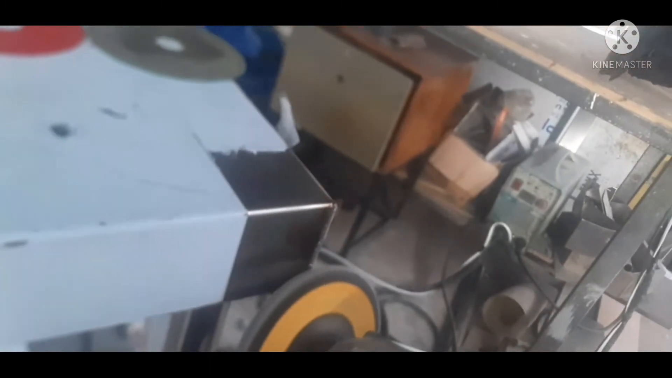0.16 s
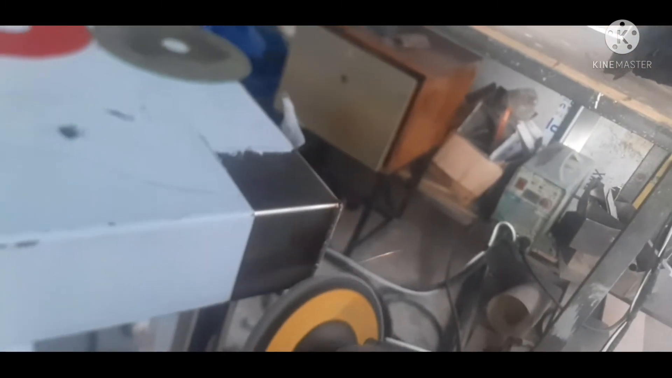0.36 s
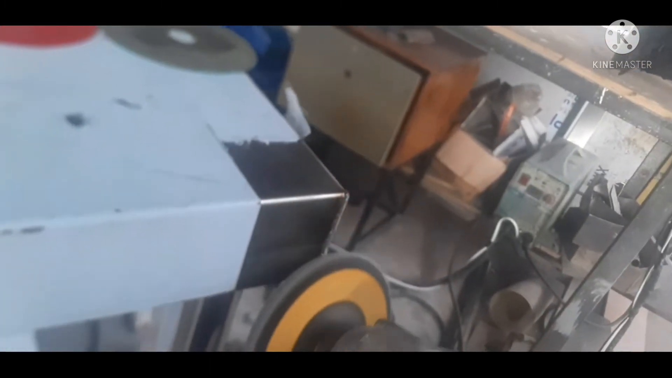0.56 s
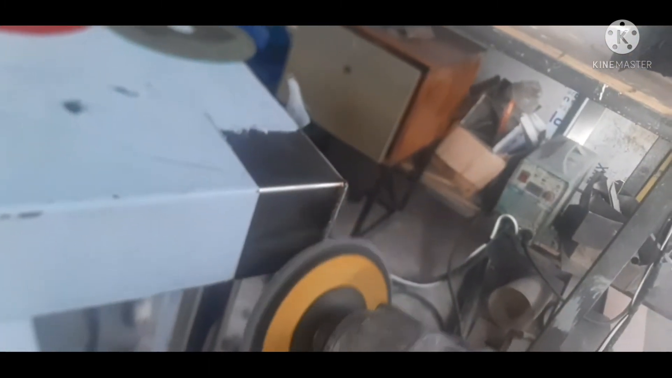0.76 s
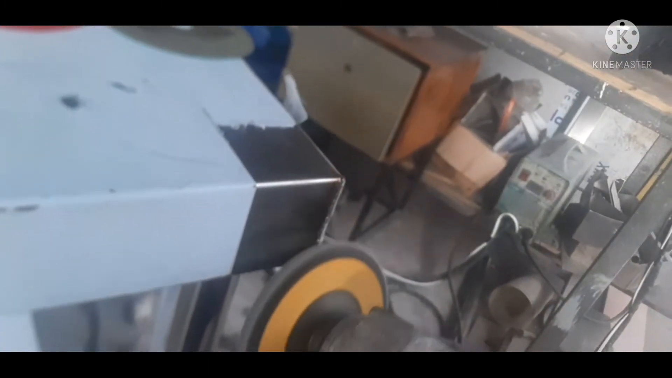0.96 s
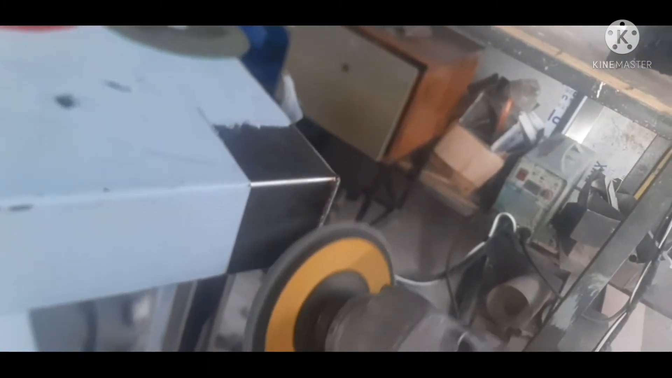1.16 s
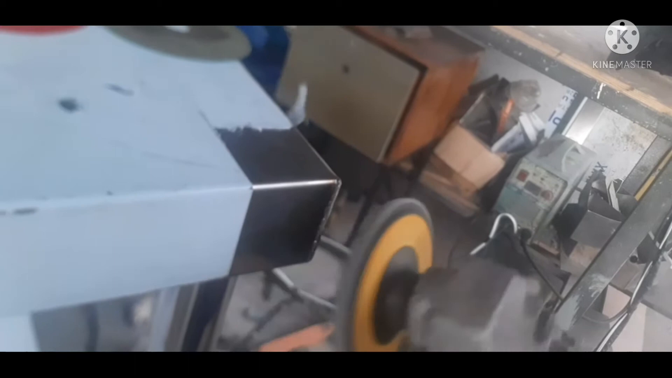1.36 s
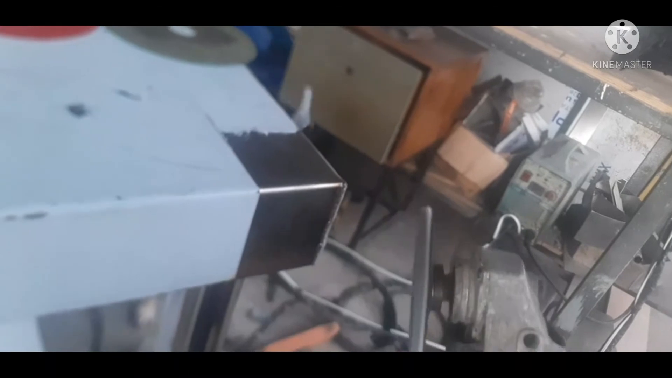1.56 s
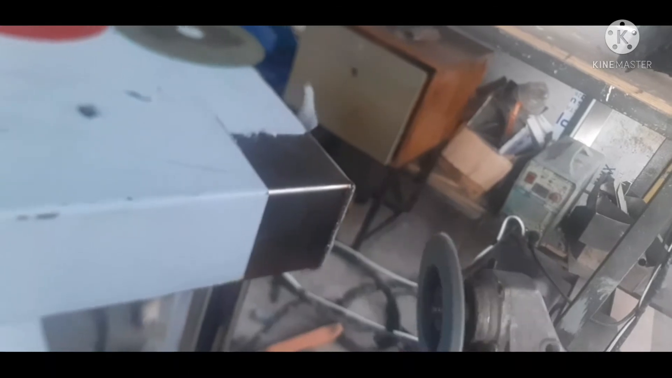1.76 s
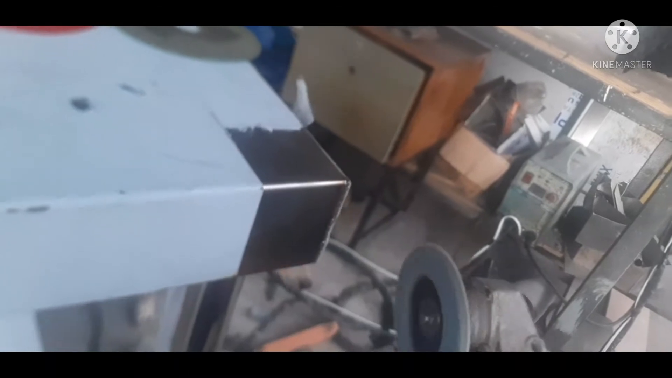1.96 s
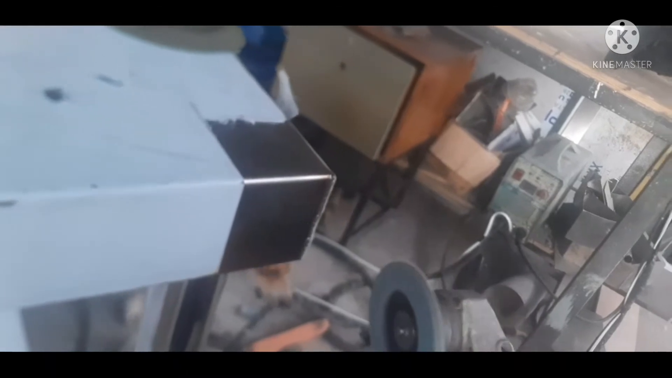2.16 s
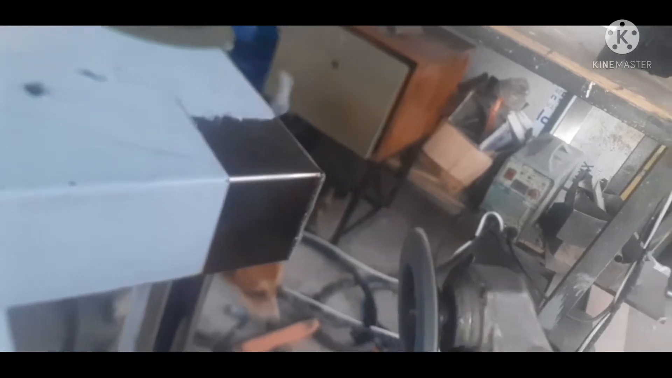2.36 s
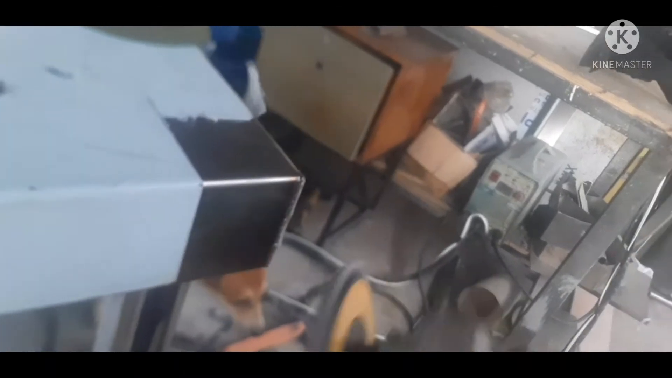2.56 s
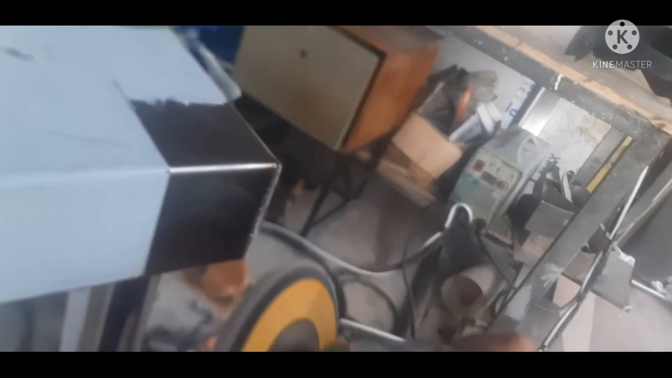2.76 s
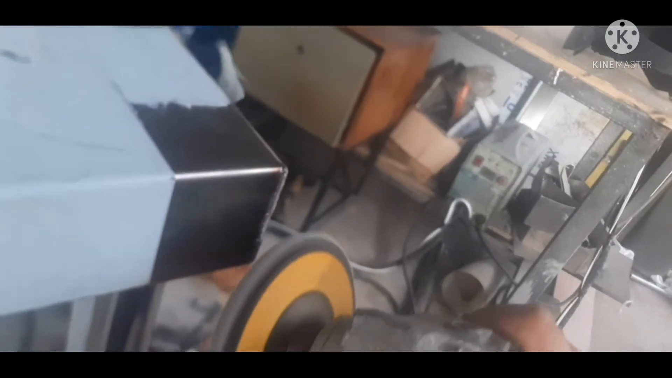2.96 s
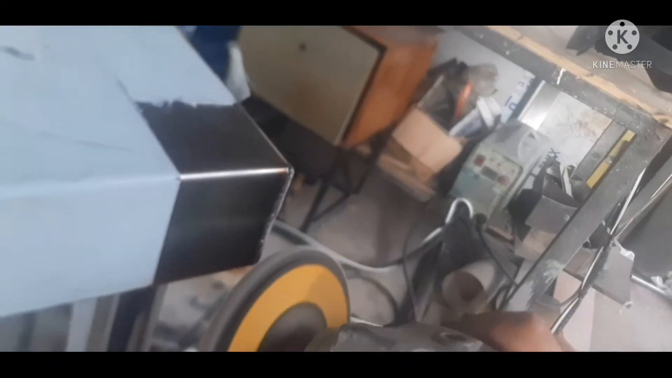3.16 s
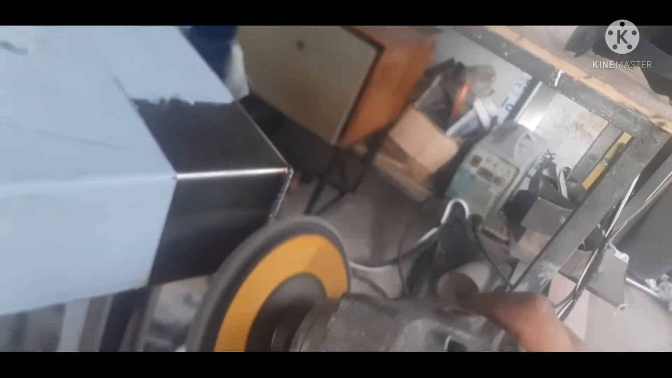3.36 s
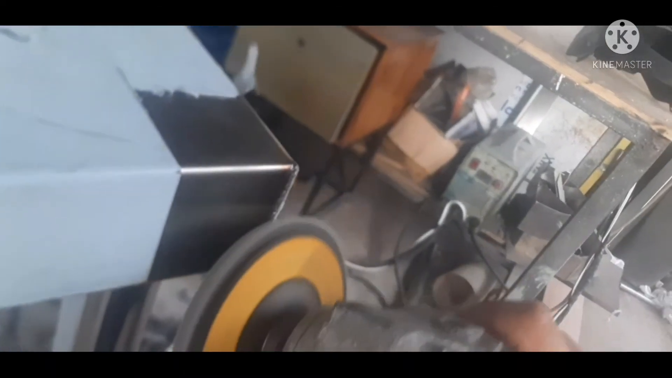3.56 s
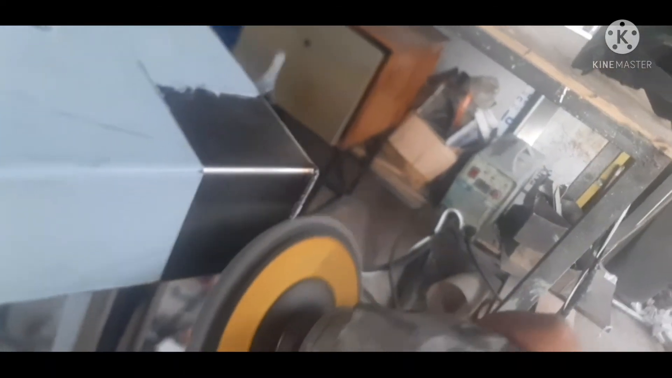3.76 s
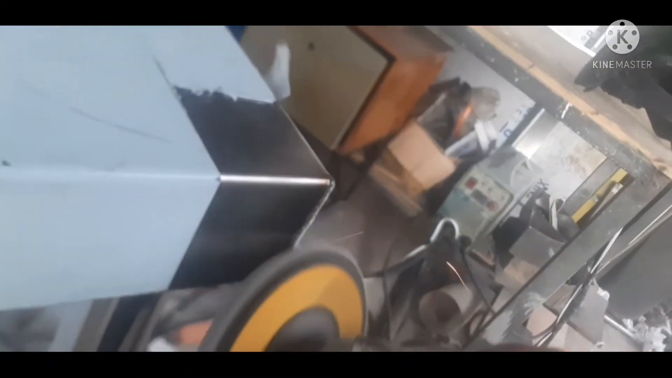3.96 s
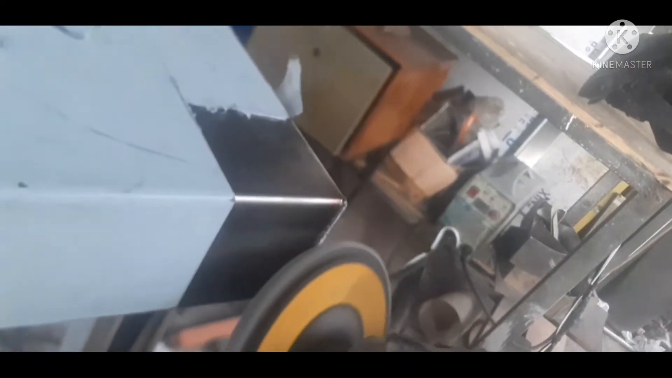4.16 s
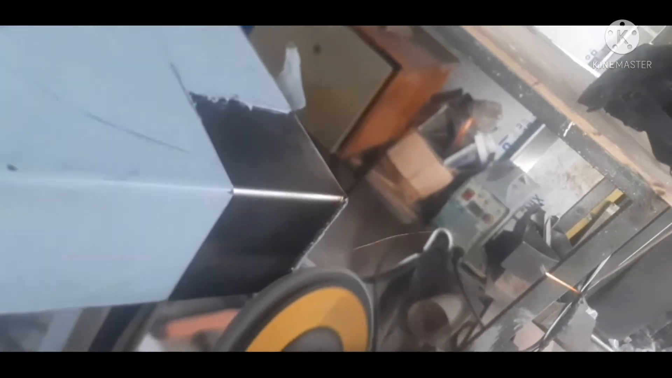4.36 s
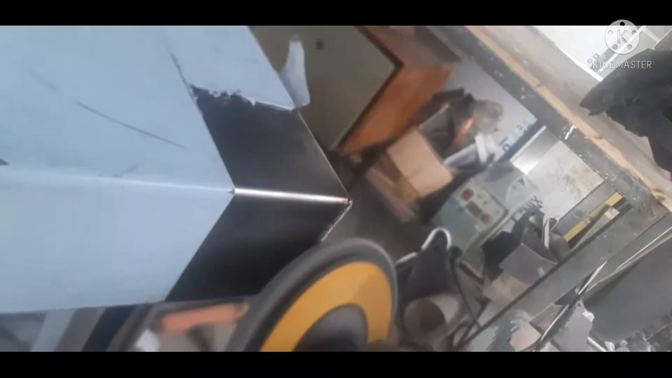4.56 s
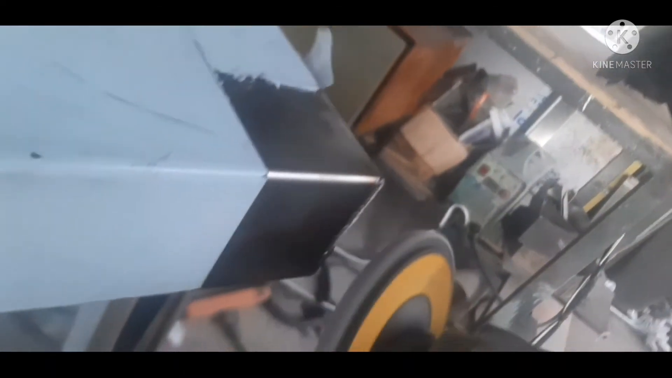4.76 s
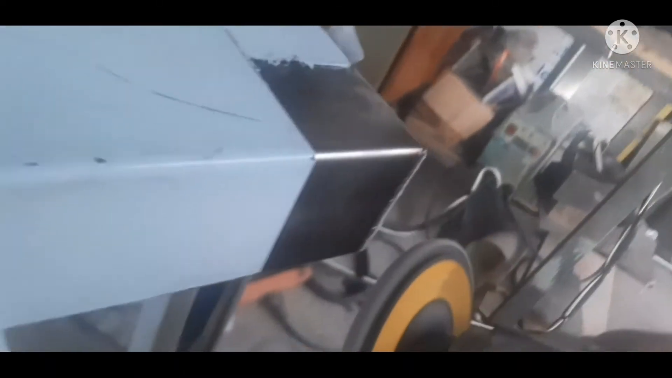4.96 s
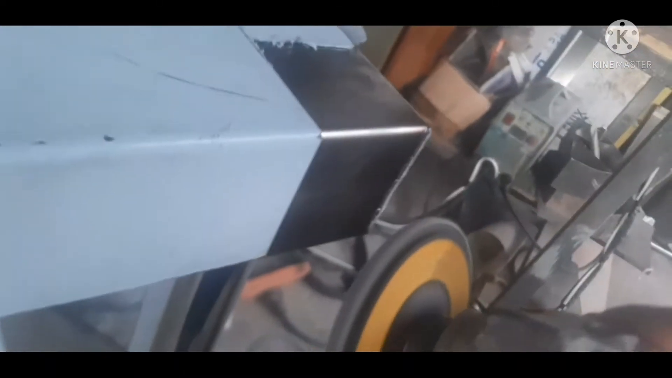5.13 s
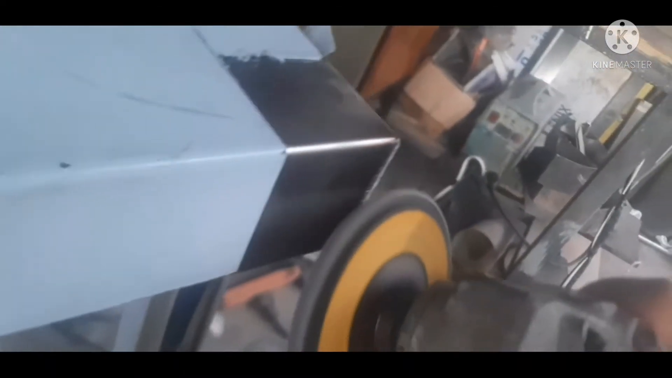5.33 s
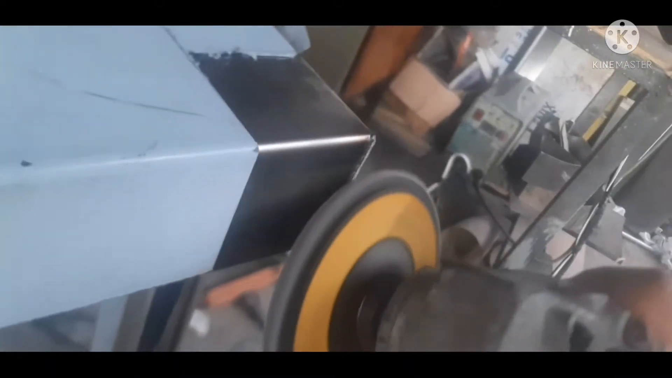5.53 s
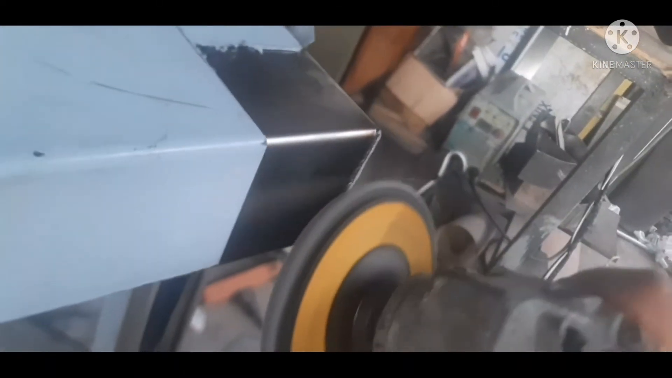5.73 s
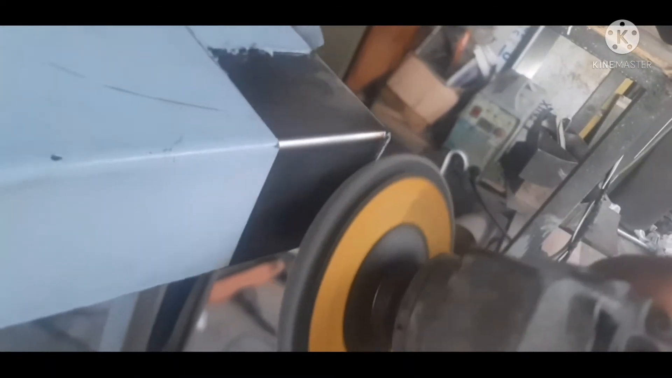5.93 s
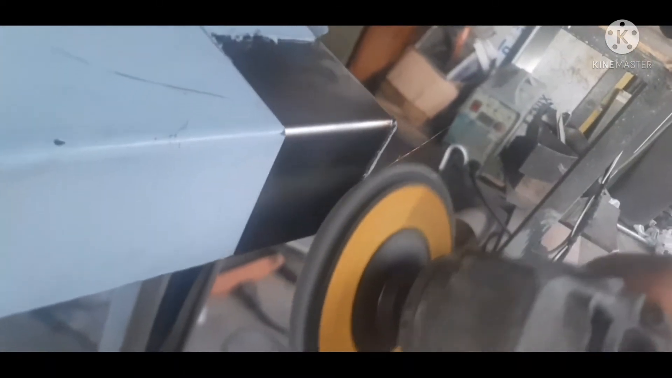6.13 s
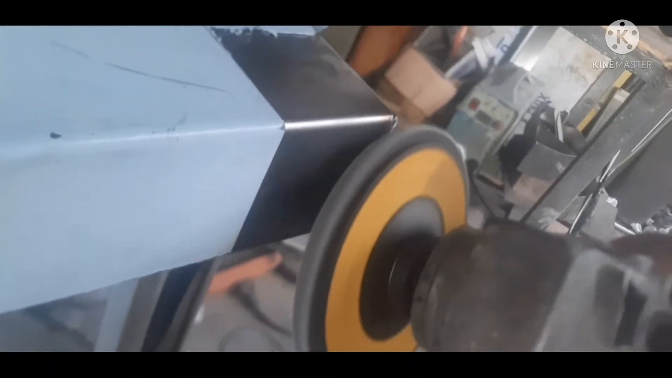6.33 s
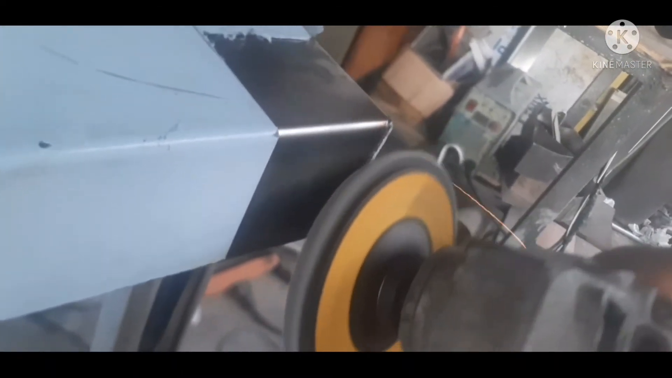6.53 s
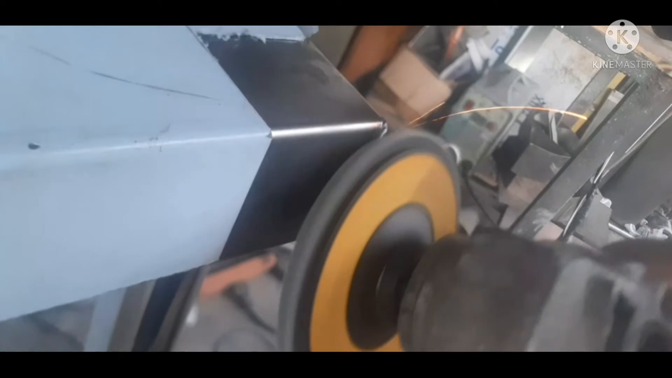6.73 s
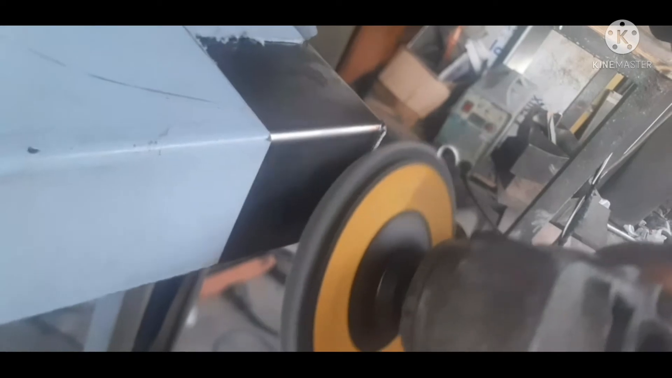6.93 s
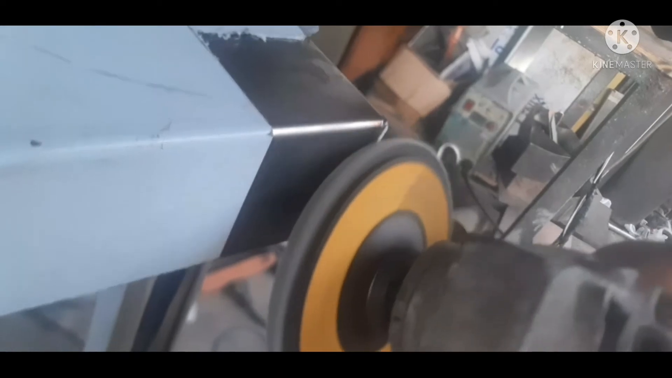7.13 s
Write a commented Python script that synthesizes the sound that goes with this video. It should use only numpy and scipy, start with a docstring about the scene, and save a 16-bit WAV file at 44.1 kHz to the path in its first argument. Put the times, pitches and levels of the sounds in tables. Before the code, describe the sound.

Continuous loud power-tool noise, close and in stereo: fan roar roughened by gear clatter, never stopping. Three times a flap disc lands on a steel weld, adding a dense, finely buzzing hiss and metallic ringing that sinks slightly in pitch under load. Between passes the hiss drops out, leaving a hollow airy howl, gear knocks, thin whine and small ticks. Dull handling bumps and low rumble sit underneath.

```python
"""A bright, finely ribbed hiss over a roar: an angle grinder close by, its flap disc laid on a steel weld three times.
Hiss: grit noise round the rim, re-read every turn, so it sinks in pitch as the motor is loaded; steel rings, flaps whistle.
Roar: fan noise swollen by gear knocks, through housing and guard resonances, recoloured as the tool is turned edge-on.
Behind: whines, rim ticks, handling bumps, shop rumble and a faint hum, all as filtered noise."""
import sys
import numpy as np
from scipy import signal
from scipy.fft import rfft, irfft
from scipy.io import wavfile
from scipy.ndimage import uniform_filter1d, map_coordinates

SR = 44100
rng = np.random.default_rng(int(sys.argv[2]) if len(sys.argv) > 2 else 0)


def to_wav(sig):
    """Store sig (one row per channel, or 1-D mono) as 16-bit WAV at the path in sys.argv[1].

    Samples outside -1..1 are clipped; the rate is SR.
    """
    pcm = np.clip(np.atleast_2d(sig), -1, 1) * 32767
    pcm = np.round(pcm).astype(np.int16)
    wavfile.write(sys.argv[1], SR, pcm.T)  # frames by channels


N = 317079
TIME = np.arange(N) / SR
FRAMES = dict(nperseg=1024, noverlap=768)

# running tool, 1100-4400 Hz level, louder nearer the microphone: t/s, level/dB
TOOL_LEVEL = [(0, -19), (.35, -21), (1.35, -20), (1.53, -19), (1.72, -20.5), (1.85, -24.5), (2.27, -29.5),
              (2.34, -28), (2.45, -24.5), (2.52, -26), (2.76, -22.5), (2.92, -17.5), (3.38, -17),
              (3.85, -19.5), (3.96, -20), (4.75, -21), (4.9, -19.5), (7.19, -22)]
# gear head resonances: f/Hz, width/Hz, gain/dB
HOUSING_MODES = [(1210, 260, -8.5), (3100, 50, -1), (3505, 200, -6.5), (4840, 100, -9.5), (14300, 276, -9)]
# breathy howl of the cooling air: t/s, f/Hz, level re fan/dB
AIR_HOWL = [(1.6, 2060, -7), (1.85, 2070, -2), (2.1, 2240, 0), (2.45, 2350, -1), (2.67, 2280, -3),
            (2.8, 1960, -2), (3.05, 2050, -9)]
HOWL_WIDTH_HZ, HOWL_WAVER_HZ, HOWL_WAVER_RATE_HZ = 170, 45, 14
# hollow housing note, open and stifled as the hand closes round it
HOLLOW_OPEN_DB, HOLLOW_HELD_DB = -39, -73.5
GRIP_S, GRIP_TAKES_S = 2.57, 0.016


def grinder(flutter_db=0.65, throb=0.057, shaded_db=-5, hollow_band_hz=(760, 1150), hollow_share=0.35,
            guard_hz=6640, guard_width_hz=400, guard_db=-19.5, guard_contact_db=2.0):
    """Fan and gear noise throbs once a turn and rings housing, air vents and guard; guard ping grows on the weld."""
    turns = np.cumsum(disc_speed()) / SR
    drive = ports(clatter()) * amp(flutter_db * wander(48)) * (1 + throb * np.cos(2 * np.pi * turns))

    housing = sum(amp(db) * resonate(drive, hz, width) for hz, width, db in HOUSING_MODES)
    housing = housing * amp(shaded_db * curve(EDGE_TURN))
    howl_hz = curve(AIR_HOWL) + HOWL_WAVER_HZ * wander(HOWL_WAVER_RATE_HZ)
    howl = amp(curve(AIR_HOWL, axis=2)) * resonate(drive, howl_hz, HOWL_WIDTH_HZ)
    roar = radiate(drive + housing + howl)

    # level the middle range so TOOL_LEVEL holds at any angle
    middle_sos = signal.butter(4, [1100, 4400], "bandpass", fs=SR, output="sos")
    middle = signal.sosfilt(middle_sos, roar.mean(0))
    roar = roar / np.sqrt(uniform_filter1d(middle ** 2, size=SR // 8))

    tool_db = curve(TOOL_LEVEL)
    hollow_sos = signal.butter(2, hollow_band_hz, "bandpass", fs=SR, output="sos")
    hollow = unit(signal.sosfilt(hollow_sos, drive))
    hollow_db = HOLLOW_OPEN_DB + (HOLLOW_HELD_DB - HOLLOW_OPEN_DB) * ramp(GRIP_S, GRIP_TAKES_S)
    hollow_db = hollow_db + hollow_share * (tool_db - tool_db.mean())

    ping = resonate(resonate(drive, guard_hz, guard_width_hz), guard_hz, guard_width_hz)
    ping_db = tool_db + curve(AIM_LIFT) + guard_db + guard_contact_db * on_weld()
    ping = ping / ping.mean(0).std() * amp(ping_db)
    return roar * amp(tool_db) + hollow * amp(hollow_db) + ping


# parts shaken by the gears, casing up to guard rim: top of range f/Hz, clatter/dB
SHAKEN_PARTS = [(1700, -15), (2900, -4), (4400, -1.5), (6100, -3.5), (9000, 3.5), (16000, -3.5)]
# hardest gear knocks, disc running free: t/s, level re running noise/dB
HARD_KNOCKS = [(1.524, -4), (1.540, -2), (1.743, -5), (1.863, -9), (1.943, 0), (2.035, -1), (2.436, -4),
               (2.452, -7), (2.466, -1), (2.598, 0), (2.660, -4), (2.697, -10), (2.782, -2)]
KNOCK_RISE_S, KNOCK_TAIL, KNOCK_TAIL_S = 0.00074, 0.07, 0.009
# clatter re fan: running free, change under load, change edge-on
PLAY_FREE_DB, PLAY_LOADED_DB, PLAY_EDGE_ON_DB = -5.5, -2.5, 1.5


def clatter(turns_per_knock=2, uneven=0.12, spread_db=4.5, late_s=0.0014, ring_s=0.00082):
    """Fan noise swells with a gear knock about every second turn; load holds the teeth in mesh and weakens it."""
    gaps = np.exp(uneven * rng.standard_normal(900))
    times = np.cumsum(gaps) * turns_per_knock / disc_speed().mean()
    t = TIME[:SR // 20]
    burst = t / ring_s * np.exp(-t / ring_s) + KNOCK_TAIL * np.exp(-t / KNOCK_TAIL_S)
    hz = np.fft.rfftfreq(N, 1 / SR)
    part = np.searchsorted([top for top, db in SHAKEN_PARTS[:-1]], hz)
    slack = amp(PLAY_FREE_DB + PLAY_LOADED_DB * on_weld() + PLAY_EDGE_ON_DB * curve(EDGE_TURN))
    out = 0
    for k, (top, db) in enumerate(SHAKEN_PARTS):
        late, size = rng.random((len(times), 2)).T
        starts = ((times + late_s * late) * SR).astype(int)
        knocks = np.bincount(starts, amp(spread_db * np.sqrt(12) * size), N)[:N]
        train = unit(signal.oaconvolve(knocks, burst)[:N])
        play = slack * amp(db)
        swell = np.sqrt((1 + (play * train) ** 2) / (1 + play ** 2))
        out = out + rfft(swell * rng.standard_normal((2, N))) * (part == k)
    hard = sum(amp(db) * puff(start, KNOCK_RISE_S) for start, db in HARD_KNOCKS)
    return irfft(out, N) * (1 + hard)


# tool attitude: t/s, turn (0 = disc faces microphone, 1 = edge-on)
EDGE_TURN = [(1.5, 0.045), (1.95, 1), (2.5, 0.89), (2.76, 0.7), (2.92, 0.63)]
# tool colour, disc facing: f/Hz, gain/dB
FACING_COLOUR = [(150, -49), (500, -55), (760, -19.5), (990, -30.5), (1120, -4), (1450, -9), (2050, -3),
                 (2500, -2.5), (3600, 0), (5500, -0.5), (6800, -9), (8100, -17), (9600, -18.5),
                 (11500, -9.5), (13200, -13.5), (15500, -12)]
# tool colour, edge-on: f/Hz, gain/dB
EDGE_ON_COLOUR = [(150, -48), (500, -19), (750, -32), (1050, -10), (1850, -5.5), (2350, -2.5), (2620, -2.5),
                  (3500, -3), (4100, -1), (4900, -2.5), (6000, -5.5), (6800, -3.5), (8100, -23.5),
                  (10000, -20.5), (11800, -13.5), (13200, -25), (14000, -13), (14700, -22), (15400, -25)]
# upper middle range as the tool is moved about: t/s, lift/dB
AIM_LIFT = [(0, -1), (1.4, -1), (1.65, -1), (2.1, -6), (2.75, -2), (3.1, 4.5), (3.55, 1), (4.88, 2.5),
            (5.15, -1), (5.6, 0.5), (5.95, 4.5), (6.4, 1.5), (7.19, 4)]
# resonances swelling as tool and steel shift: t/s, half length/s, f/Hz, half width/Hz, lift/dB
RESONANCE_SWELLS = [(1.61, 0.07, 5650, 220, 7), (2.45, 0.15, 3500, 280, 8), (3.08, 0.081, 4550, 150, 0),
                    (3.52, 0.085, 4800, 150, 5), (5.2, 0.16, 3500, 200, 1), (5.993, 0.16, 4930, 300, 3.5)]


def radiate(x, beam_hz=5500, beam_octaves=0.34, bounce_s=0.0034, sway=0.044, bounce=0.22, patchy_db=2.0):
    """Colour follows the tool's turn; edge-on, the bounce off the bench makes a gliding comb."""
    hz, t, z = signal.stft(x, SR, **FRAMES)
    turned = curve(EDGE_TURN, t)
    db = np.outer(spectrum(FACING_COLOUR, hz), 1 - turned) + np.outer(spectrum(EDGE_ON_COLOUR, hz), turned)
    beam = np.exp(-(np.log2((hz + 1) / beam_hz) / beam_octaves) ** 2)
    db = db + np.outer(beam, curve(AIM_LIFT, t))
    for at, length, centre, width, lift_db in RESONANCE_SWELLS:
        band = np.exp(-((hz - centre) / width) ** 2)
        db = db + lift_db * np.outer(band, np.exp(-((t - at) / length) ** 2))
    db = db + patchy_db * patches(db.shape, size=4, order=50)  # colour drifts as the hand moves
    delay = bounce_s * (1 + sway * np.interp(t, TIME, wander(1.8)))
    comb = 1 + bounce * turned * np.exp(-2j * np.pi * np.outer(hz, delay))
    return signal.istft(z * amp(db) * comb, SR, **FRAMES)[1][:, :N]


# disc speed, sagging through each pass and briefly on the swing: t/s, speed/(turns/s)
SPEED_CURVE = [(0, 148.8), (.7, 147.3), (1.45, 146.6), (1.85, 150.5), (2.11, 150.5), (2.3, 142.3),
               (2.47, 150.3), (3.63, 149), (4, 147), (4.4, 144.8), (4.85, 143.4), (5.15, 147.2),
               (5.64, 150.2), (6, 147.9), (6.5, 143.6), (6.85, 142.3), (7.19, 141.8)]


def disc_speed():
    """Disc speed in turns a second."""
    return curve(SPEED_CURVE)


# grit colour: f/Hz, gain/dB
GRIT_COLOUR = [(300, -33.5), (900, -14.5), (2000, -1), (4150, 1), (5400, -4.5), (6900, 6), (8200, -9),
               (9200, -2), (10300, 3.5), (11800, 5.5), (13400, 3), (14600, 5.5), (15500, 4.5)]
# steel box resonances: f/Hz, width per stage/Hz, level/dB
STEEL_MODES = [(3730, 340, -3), (4930, 500, -1.5)]
# flap whistles on the weld: multiple of disc speed, level re hiss/dB before the pass's whistle gain
FLAP_WHISTLES = [(32, -25), (46.5, -19), (71, -13), (75, -19), (77, -21)]
# weld passes: start t/s, end t/s, hiss/dB before trim, whistle gain/dB, steel ring re hiss/dB
WELD_PASSES = [(0, 1.5, -26.5, -5, -3.5), (3.63, 4.85, -24.5, -3.5, -9), (5.639, 7.3, -22.5, -3, -27.5)]
# disc lands lightly, then is pressed home
LIGHT_TOUCH_DB, PRESS_S = -2, 0.22


def grinding(trim_db=0.22, lasting=0.78, loose=0.51, wobble=0.2, ripple=0.23, high_spots=5,
             flap_load_db=3.0, flap_width_hz=25, shake_db=1.0):
    """Grit scrapes the weld and rings the steel; the flaps add thin whistles that grow with load."""
    speed = disc_speed()
    turns = np.cumsum(speed) / SR
    scrape = np.array([grit_track(turns, lasting) for port in range(2)])
    scrape = scrape + loose * rng.standard_normal((2, N))

    # light: one bite a turn; loaded: rides on all high spots
    load = (speed.max() - speed) / np.ptp(speed)
    bite = wobble * (1 - load) * np.cos(2 * np.pi * turns)
    pressure = 1 + bite + ripple * load * np.cos(2 * np.pi * high_spots * turns)
    hiss = unit(colour(scrape * pressure, GRIT_COLOUR))

    whistle = sum(amp(db) * narrow(multiple * speed, flap_width_hz) for multiple, db in FLAP_WHISTLES)
    ring = 0
    for hz, width, db in STEEL_MODES:
        ring = ring + amp(db) * resonate(resonate(rng.standard_normal((2, N)), hz, width), hz, width)
    ring = unit(ring)

    ringing, whistling, contact = 0, 0, 0
    for start, end, hiss_db, whistle_db, ring_db in WELD_PASSES:
        touch = touching(start, end)
        press_db = LIGHT_TOUCH_DB * np.exp(-np.maximum(TIME - start, 0) / PRESS_S)
        ringing = ringing + amp(ring_db) * touch
        whistling = whistling + amp(whistle_db) * touch
        contact = contact + amp(hiss_db + press_db) * touch

    mix = ports(hiss + amp(flap_load_db * load) * whistling * whistle + ringing * ring * pressure)
    mix = mix / band_rms(mix, 9500, 15500)
    return mix * contact * amp(trim_db + shake_db * wander(77))


def grit_track(turns, lasting, size=300):
    """Grit round the rim, read once a turn; part of it wears away each time."""
    fresh = rng.standard_normal((int(turns[-1]) + 2, size))
    rim = signal.lfilter([1], [1, -lasting], fresh, axis=0)
    return unit(map_coordinates(rim.ravel(), [turns * size], order=3))


def touching(start, end, land_s=0.01, lift_s=0.051):
    """One with the disc on the weld, zero off it."""
    return ramp(start - land_s / 2, land_s) - ramp(end - lift_s / 2, lift_s)


def on_weld():
    """Contact through all the passes."""
    return sum(touching(start, end) for start, end, *rest in WELD_PASSES)


# free-running fan, gear and motor whines: start t/s, end t/s, multiple of disc speed, level/dB before ports
FREE_WHINES = [(1.8, 2.62, 6, -46), (2.07, 2.57, 37, -38), (4.98, 5.62, 85.4, -46)]
WHINE_WIDTH_HZ, WHINE_FADE_S = 25, 0.08


def whines():
    """Faint thin whines glide with the disc speed while the disc is off the steel."""
    out = 0
    for start, end, multiple, db in FREE_WHINES:
        gate = ramp(start, WHINE_FADE_S) - ramp(end - WHINE_FADE_S, WHINE_FADE_S)
        out = out + amp(db) * gate * narrow(multiple * disc_speed(), WHINE_WIDTH_HZ)
    return out


# guard rim ticks as the tool is swung back: t/s, level/dB before ports
RIM_TICKS = [(2.311, -29), (2.324, -22), (2.337, -21), (2.349, -31), (2.360, -29), (2.409, -26)]
# rim resonances: f/Hz, width per stage/Hz, relative level/dB
RIM_MODES = [(3500, 830, -5), (11900, 1200, 4), (14000, 600, -5)]
TICK_RISE_S = 0.0012


def ticks():
    """A quick run of sharp ticks: rim-resonant noise under short puffs."""
    ring = unit(sum(amp(db) * narrow(hz, width) for hz, width, db in RIM_MODES))
    return ring * sum(amp(db) * puff(start, TICK_RISE_S) for start, db in RIM_TICKS)


# soft handling bumps: t/s, level/dB before ports, f/Hz
HANDLING_BUMPS = [(.94, -47.5, 210), (1.985, -49, 125), (2.035, -47.5, 218), (2.865, -47, 104),
                  (3.201, -52, 130), (3.3, -52, 220), (3.439, -54, 151), (5.95, -47, 170)]
BUMP_RISE_S, BUMP_WIDTH_SHARE = 0.013, 0.98


def bumps():
    """Dull noise puffs that swell and die in a few hundredths of a second."""
    out = 0
    for start, db, hz in HANDLING_BUMPS:
        out = out + amp(db) * puff(start, BUMP_RISE_S) * narrow(hz, BUMP_WIDTH_SHARE * hz)
    return out


# shop rumble colour: f/Hz, gain/dB
SHOP_COLOUR = [(20, -42), (40, -30), (65, -1.5), (130, 3.5), (250, 0.5), (400, 0), (700, 1), (1500, -25)]
# rumble: shop alone, and rise with the disc on the weld
RUMBLE_DB, RUMBLE_CONTACT_DB = -65.5, 7
HUM_HZ, HUM_WIDTH_HZ, HUM_DB = 524.5, 16, -67.5


def shop(lumpy_db=2.4, draught_hz=90, draught_db=3.0, near_share=0.17):
    """Low rumble, nearly unrelated at the two ports, plus a hum; the tool's draught makes the deepest part gusty."""
    low = ports(colour(rng.standard_normal((2, N)), SHOP_COLOUR))
    deep = signal.sosfiltfilt(signal.butter(2, draught_hz, fs=SR, output="sos"), low)
    low = low + deep * (amp(draught_db * wander(13)) - 1)
    low = low / band_rms(low, 40, 450)
    near_db = curve(TOOL_LEVEL) - curve(TOOL_LEVEL).mean()
    rumble_db = RUMBLE_DB + RUMBLE_CONTACT_DB * on_weld() + near_share * near_db + lumpy_db * wander(6.8)
    return low * amp(rumble_db) + amp(HUM_DB) * narrow(HUM_HZ, HUM_WIDTH_HZ)


# likeness of the two microphone ports: f/Hz, correlation (clipped to 0.99)
PORT_LIKENESS = [(150, 0), (600, 0.5), (1300, 1), (2200, 0.62), (3300, 0.54), (4300, 0.5), (5200, 0.8),
                 (6800, 0.5), (9000, 0.7), (15000, -0.2)]
# port balance: f/Hz, left minus right/dB
PORT_LEAN = [(60, 4), (110, -4.5), (200, -2.5), (380, -2.5), (700, -2.5), (1290, -2.5), (2380, -2.5),
             (4400, -3.5), (8120, -1), (15000, -1)]
# four tool stances, each: f/Hz, lead of left port/rad
STANCE_LEADS = [
    [(300, 0), (2200, .3), (3300, -.7), (4300, 1.8), (5200, .2), (6600, .5), (8500, -2.5), (10000, -1.1),
     (12000, -2), (14000, -5)],
    [(300, 0), (1300, -.5), (2200, -1.9), (3300, -1.7), (4300, -2.5), (5200, -1.7), (6600, -1.3),
     (10000, -2), (14000, -6.4)],
    [(300, 1.5), (1300, .3), (3000, .6), (5200, 0), (6600, .7), (10000, .3), (12000, 4)],
    [(300, -1.5), (1300, .9), (2200, -1.2), (3400, .3), (4200, -2.4), (6800, -1.9), (9000, -2.8),
     (10300, -2), (12000, -5.5)],
]
# moves through the stances: t/s, stance number (fractions on the way)
STANCE_MOVES = [(1.5, 0), (1.9, 1), (2.79, 1), (3, 2), (4.9, 2), (5.15, 3), (5.62, 3), (5.95, 2.7),
                (6.3, 3)]


def ports(x, twist_hz=4000, twist_rad=0.56):
    """Two unrelated signals become a microphone pair; phase follows the stance, randomly twisted in the treble."""
    hz, t, (a, b) = signal.stft(x, SR, **FRAMES)
    hz = hz[:, None]
    place = curve(STANCE_MOVES, t)
    lead = 0
    for k, stance in enumerate(STANCE_LEADS):
        lead = lead + np.maximum(1 - abs(place - k), 0) * np.exp(-1j * spectrum(stance, hz))
    same = np.clip(spectrum(PORT_LIKENESS, hz), -0.99, 0.99) * lead
    lean = amp(spectrum(PORT_LEAN, hz) / 2)
    phase = twist_rad * np.tanh(hz / twist_hz) ** 2 * patches(a.shape, size=7, order=160)
    right = (same * a + np.sqrt(1 - abs(same) ** 2) * b) * np.exp(1j * phase)
    return signal.istft(np.array([a * lean, right / lean]), SR, **FRAMES)[1][:, :N]


def amp(db):
    """Decibels to gain."""
    return 10 ** (np.asarray(db) / 20)


def unit(x):
    """Scales to an rms of one."""
    return x / np.sqrt(np.mean(x ** 2) + 1e-20)


def curve(rows, t=TIME, axis=1):
    """One column of a time table, joined by straight lines."""
    rows = np.array(rows, float)
    return np.interp(t, rows[:, 0], rows[:, axis])


def spectrum(points, hz):
    """A frequency table, joined by straight lines on a log axis."""
    f, value = np.transpose(points)
    return np.interp(np.log(hz + 1), np.log(f), value)


def colour(x, points):
    """Filters x by a table of dB over frequency."""
    return irfft(rfft(x) * amp(spectrum(points, np.fft.rfftfreq(N, 1 / SR))), N)


def band_rms(x, lo_hz, hi_hz):
    """Rms of the middle of a stereo pair inside one band."""
    hz = np.fft.rfftfreq(N, 1 / SR)
    return np.std(irfft(rfft(x.mean(0)) * ((hz > lo_hz) & (hz < hi_hz)), N))


def wander(rate_hz):
    """Random drift of rms one, low-passed near rate_hz."""
    hz = np.fft.rfftfreq(N, 1 / SR)
    return unit(irfft(rfft(rng.standard_normal(N)) * (hz > 1) / (1 + (hz / rate_hz) ** 4), N))


def resonate(x, hz, width_hz):
    """One-pole resonance of gain one, fixed or following a curve."""
    turn = np.exp(2j * np.pi * np.cumsum(hz * np.ones(N)) / SR)
    r = np.exp(-np.pi * width_hz / SR)
    return 2 * (turn * signal.lfilter([1 - r], [1, -r], x / turn)).real


def narrow(hz, width_hz):
    """Stereo noise of rms one through two equal resonances."""
    return unit(resonate(resonate(rng.standard_normal((2, N)), hz, width_hz), hz, width_hz))


def patches(shape, size, order):
    """Random field of rms one, smooth over size bins and order frames."""
    field = uniform_filter1d(rng.standard_normal(shape), size, axis=0)
    return unit(uniform_filter1d(field, order, axis=1))


def ramp(start_s, length_s):
    """Rises from zero to one."""
    return np.clip((TIME - start_s) / length_s, 0, 1)


def puff(start_s, rise_s):
    """Swells to one and dies away."""
    age = np.maximum(TIME - start_s, 0) / rise_s
    return age * np.exp(1 - age)


def scene():
    """The tool, its disc on the weld, the small noises and the shop."""
    return grinder() + grinding() + ports(whines() + ticks() + bumps()) + shop()


def record(dry, ceiling=0.9, edge_hz=15560):
    """Rounds off the highest peaks, then low-passes at edge_hz."""
    rounded = dry / (1 + (dry / ceiling) ** 6) ** (1 / 6)
    lowpass = signal.firwin(801, edge_hz, window=("kaiser", 9), fs=SR)
    return signal.oaconvolve(rounded, lowpass[None], "same")


dry = scene()
out = record(dry)
to_wav(out)
```